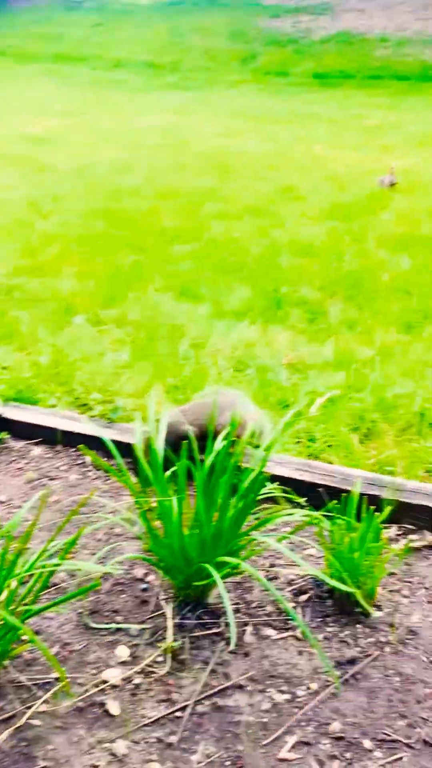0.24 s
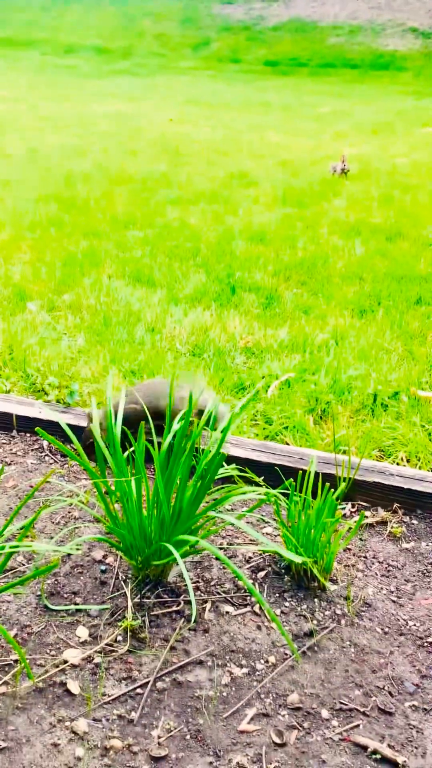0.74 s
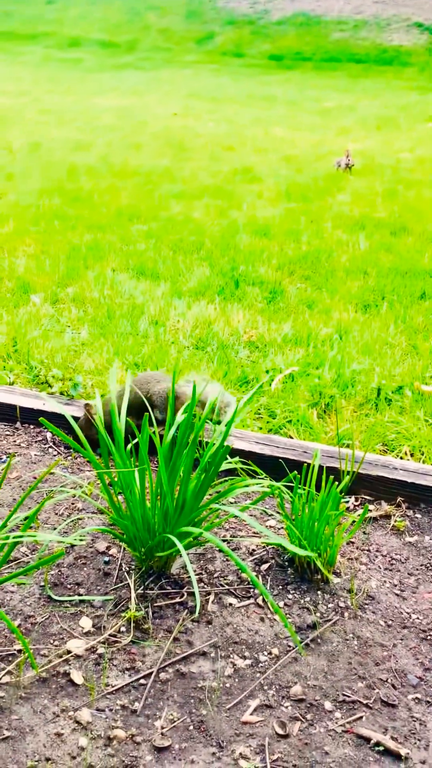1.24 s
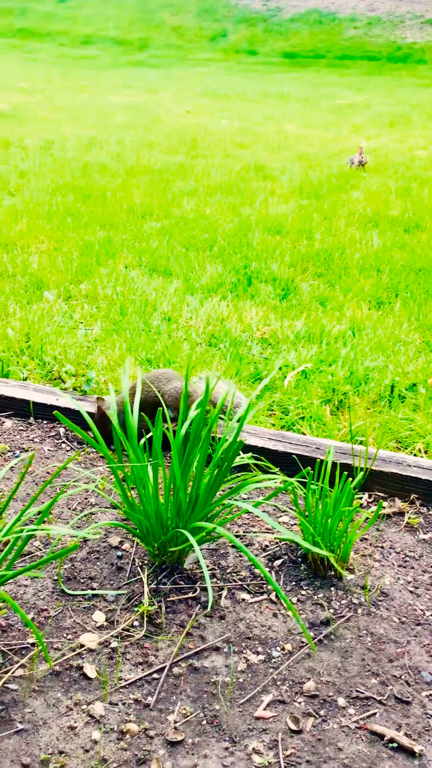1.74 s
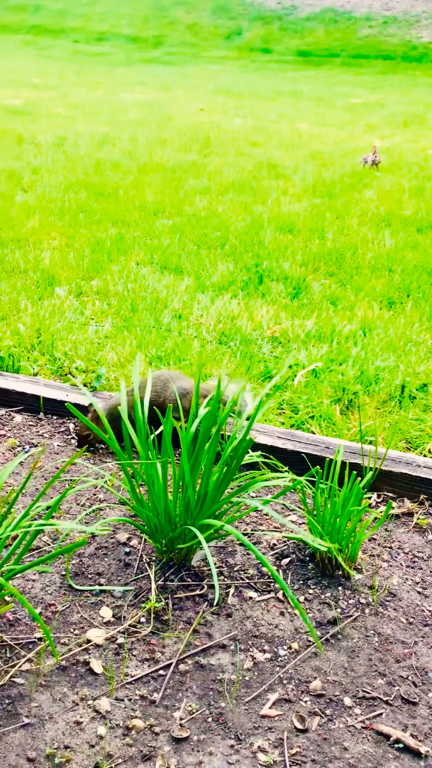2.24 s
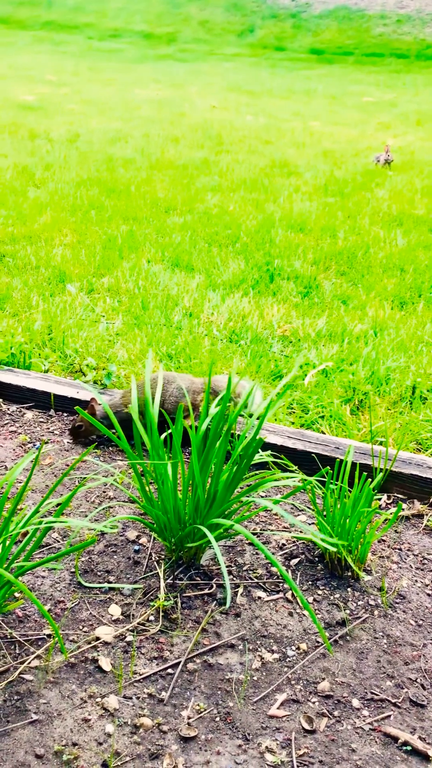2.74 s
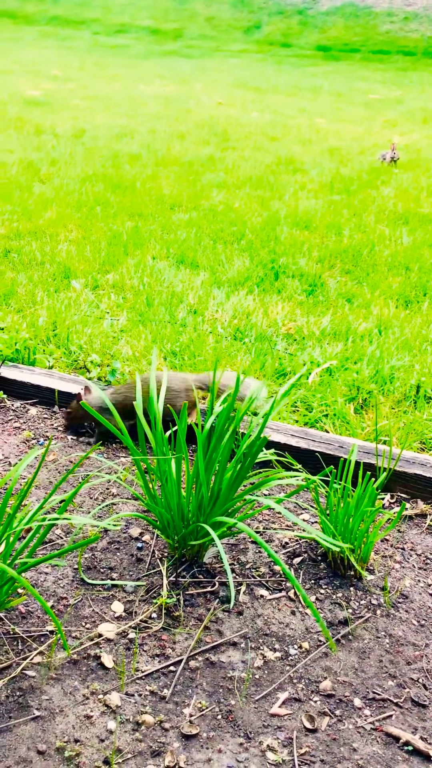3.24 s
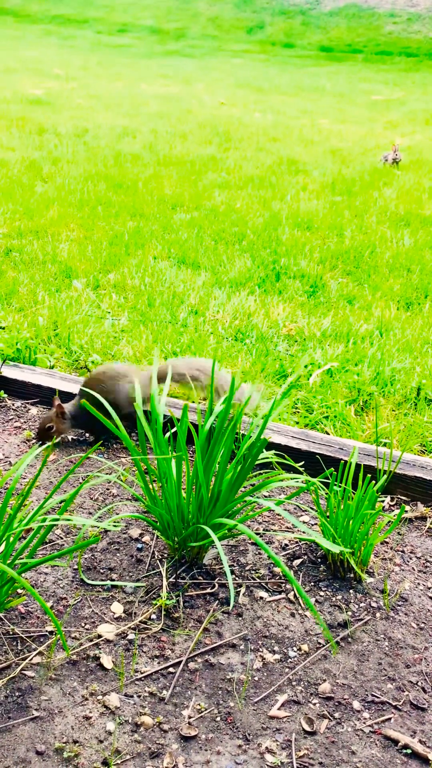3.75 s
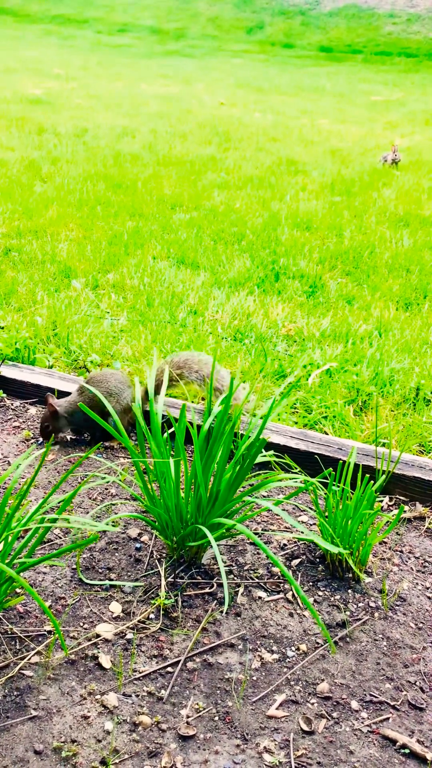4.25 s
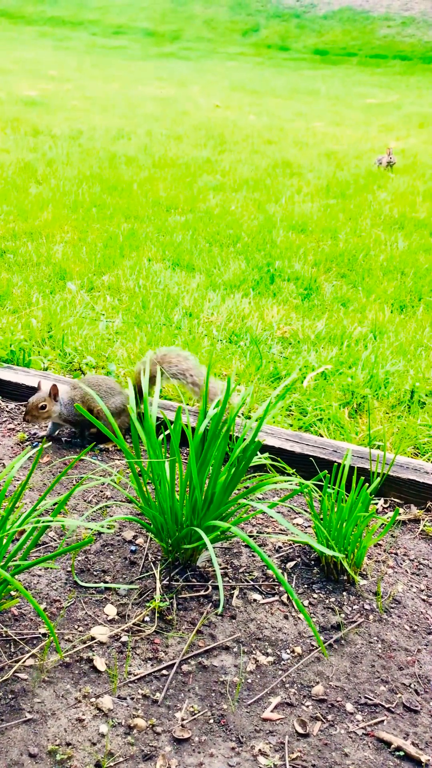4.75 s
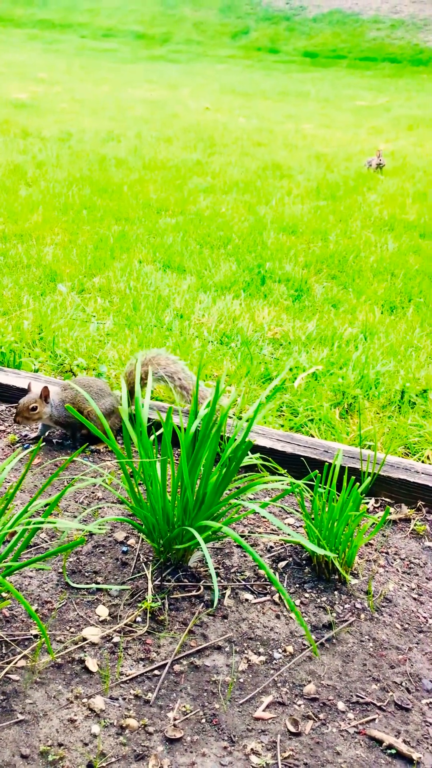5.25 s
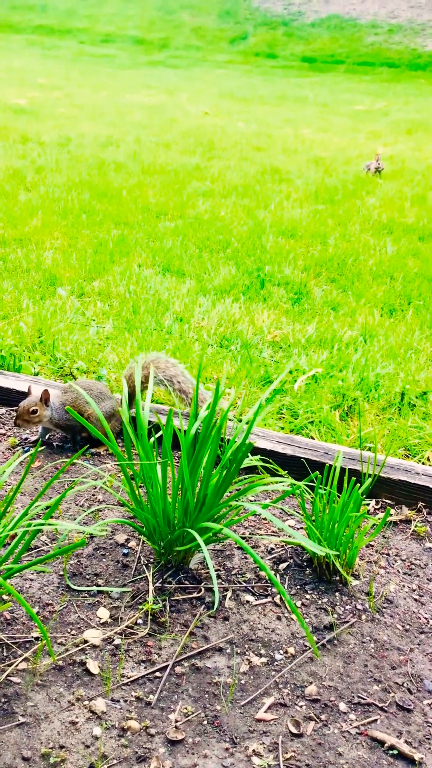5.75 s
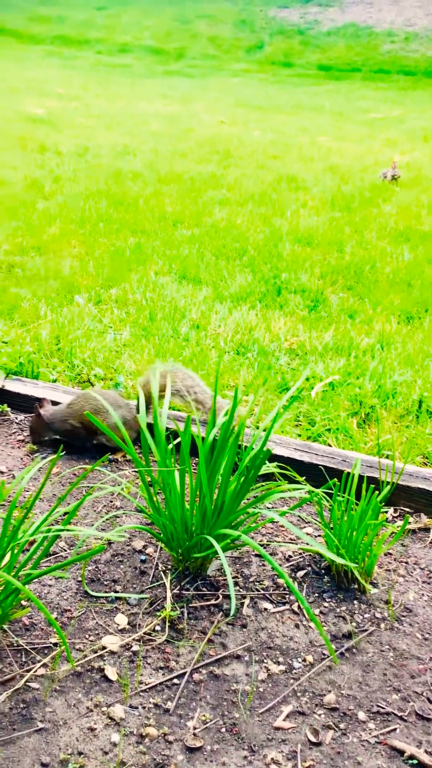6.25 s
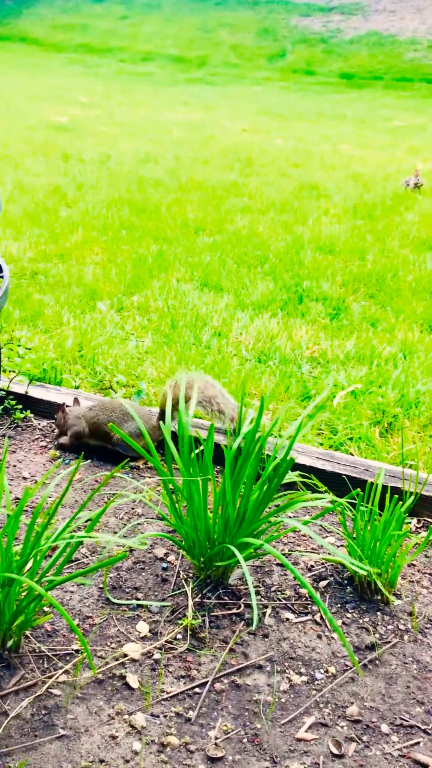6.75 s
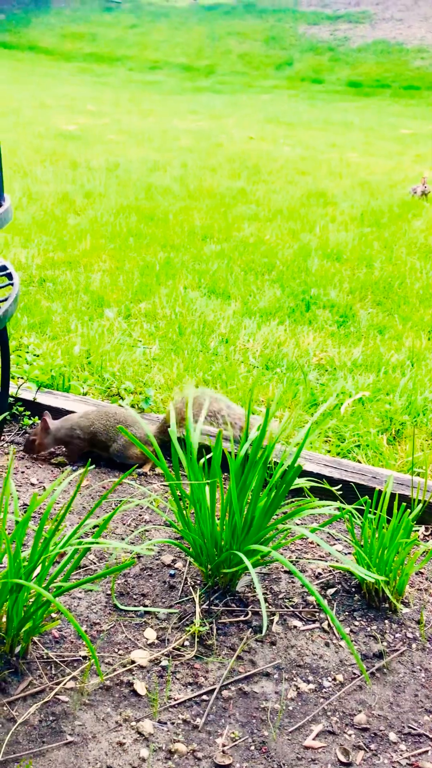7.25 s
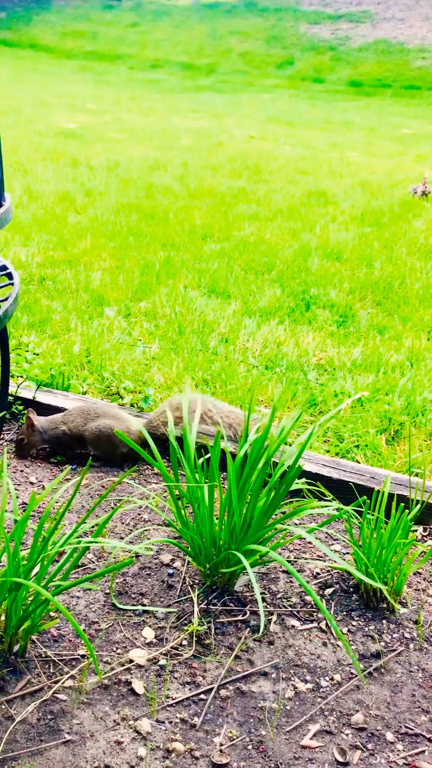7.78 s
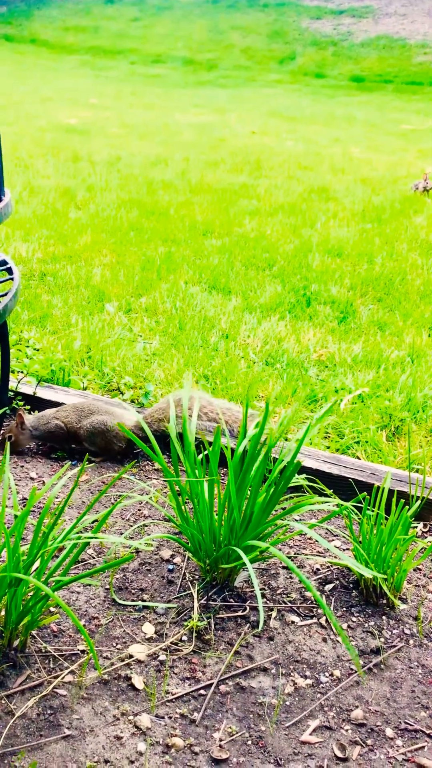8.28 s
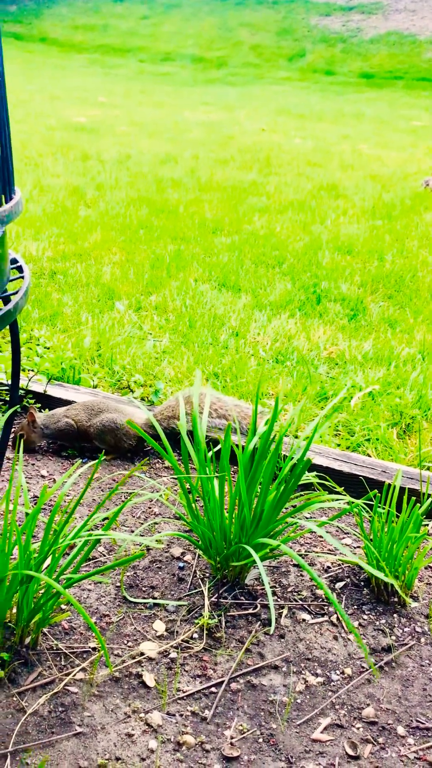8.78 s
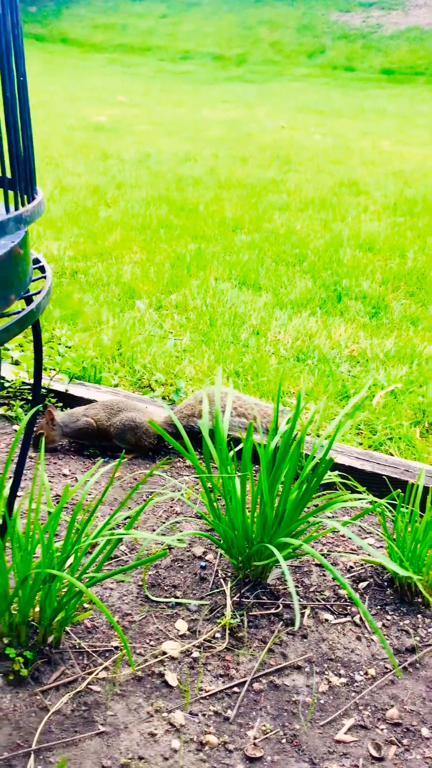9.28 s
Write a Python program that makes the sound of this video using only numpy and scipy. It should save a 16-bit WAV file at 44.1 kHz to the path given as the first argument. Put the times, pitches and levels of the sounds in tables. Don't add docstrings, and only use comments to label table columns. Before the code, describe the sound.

Outdoor phone pickup of one agitated squirrel: gritty, crackling rasps made of fast irregular clicks, dull with the mouth nearly shut and bright when open. Two barks start as slow throbs and sag in pitch. Near the end a loud scream bursts out, cut into weaker rasps. Behind lie soft road rumble, thin hiss and barely audible far whistles.

```python
import sys
import numpy as np
from scipy import signal
from scipy.fft import rfft, irfft, next_fast_len
from scipy.io import wavfile
from scipy.ndimage import uniform_filter1d, map_coordinates

SR = 44100
rng = np.random.default_rng(int(sys.argv[2]) if len(sys.argv) > 2 else 0)


def inscribe(sig):
    pcm = np.round(np.clip(np.atleast_2d(sig).T, -1, 1) * 32767)
    wavfile.write(sys.argv[1], SR, pcm.astype(np.int16))


def level_to_linear(level):
    exponent = np.asarray(level, float) / 20
    return 10 ** exponent


N = 419832
T = np.arange(N) / SR


def squirrel():
    voice = clicks() + creak() + wide_rasp() + nasal_rasp()
    voice += bark() + husky_rasp() + yap() + chest()
    voice += shut_rasp() + soft_rasp() + opening() + scream() + tired_rasp()
    return filtered(voice, lambda hz: np.exp(-1.9j) + 0 * hz)


# (time [s], peak [dB])
CLICKS = [(0.1231, -49), (4.9118, -38), (5.0736, -49), (5.082, -43.5), (5.1387, -41), (5.3023, -48),
          (5.4974, -49), (6.0122, -47), (6.044, -47), (6.0596, -39), (6.082, -39), (6.0875, -35),
          (6.0957, -28)]
# (time [s], peak [dB])
CREAKS = [(2.5854, -40), (2.5921, -33), (2.6096, -29), (2.649, -25.5), (2.679, -25.5), (6.1288, -37),
          (6.1358, -26.5), (6.2063, -19.5), (7.7695, -38), (7.7809, -33)]
# ([Hz], [dB per Hz])
SHUT = [(1137, 31, -9.5), (2060, 140, -6.5), (2195, 80, -2), (3060, 20, -0.5), (3306, 43, -0.5),
        (3690, 43, -14), (4607, 45, -11), (4840, 26, -12.5), (5280, 85, -15.5), (5500, 44, -14.5),
        (6410, 140, -15.5), (6615, 28, -18), (7926, 100, -23.5), (9030, 63, -27.5), (9550, 100, -25.5),
        (11380, 150, -34.5)], [(350, -59.5), (600, -23.5), (1090, 2), (1420, -4), (1720, -10), (1940, 3.5),
        (2690, -7), (3210, -9), (3940, -12), (4710, -10.5), (6620, -22), (7290, -23), (9450, -32),
        (10700, -40), (15600, -43)]
# ([Hz], [dB per Hz])
SOFT = [(1090, 67, -3.5), (1600, 30, -10.5), (2000, 27, -2), (2140, 61, 2), (2950, 35, -5), (3110, 39, -4),
        (3290, 76, -7), (3738, 110, -16), (4590, 42, -14), (5630, 47, -13), (6410, 66, -19),
        (7640, 170, -30), (9230, 87, -29.5), (11000, 60, -40)], SHUT[1]
# (centre [Hz], width [Hz], depth [dB])
SHUT_DIPS = [(1400, 150, -6.5), (7310, 300, -3.5), (8650, 250, -6), (10810, 410, -16), (12800, 200, -6.5),
             (14500, 400, -6), (15400, 400, -6)]


def clicks():
    closes = np.zeros((2, N))
    for row, events in zip(closes, (CLICKS, CREAKS)):
        s, db = np.transpose(events)
        row[np.round(s * SR).astype(int)] = level_to_linear(db + 13.5)
    soft = filtered(closes[0], lambda hz: 1 / (1 + (hz / 4500) ** 2))
    return throat(soft, SOFT, valley_db=-9) + throat(closes[1], SHUT, valley_db=-5, dips=SHUT_DIPS)


# ([Hz], [dB per Hz])
CREAK = [(1090, 98, -4.5), (2120, 78, 0), (3040, 53, -9.5), (4580, 36, -10.5)], [(410, -54), (700, -23.5),
         (1090, -7), (1670, -19.5), (2140, -1), (2670, -21.5), (2960, -11), (6720, -22.5), (11300, -41),
         (15600, -66.5)]
# (time [s], rate [Hz], unevenness [0-1])
CREAK_FOLDS = [(0, 617, .03)]
# (start [s], end [s], full level [dB], start under it [dB], swell [s])
CREAK_CALLS = [(0.143, 0.275, -28.5, 17, .12)]


def creak():
    level_db = breaths(CREAK_CALLS, ending_s=.008, bend=2.2)
    return rasp(level_db, CREAK, CREAK_FOLDS, valley_db=-3, flutter_db=1, scatter_db=2.5,
                breath=.65, creak_db=-28)


# ([Hz], [dB per Hz])
WIDE = [(1096, 45, -7), (1264, 120, -3.5), (2427, 73, -0.5), (2650, 180, -3.5), (3636, 98, -0.5),
        (4750, 330, -9), (5100, 35, -18), (5350, 67, -9.5), (5624, 60, -13.5), (6300, 100, -13.5),
        (6800, 270, -16.5), (7460, 72, -18.5), (9000, 160, -20.5), (9360, 79, -19.5), (9810, 120, -24),
        (11310, 100, -29.5)], [(350, -51.5), (600, -20.5), (904, -18), (1080, -3.5), (1740, -11.5),
        (2130, 0), (2580, -2), (3130, -6), (4000, -0.5), (5940, -22), (7190, -13), (8130, -23.5),
        (9320, -24.5), (12600, -42), (15600, -35)]
# (time [s], rate [Hz], unevenness [0-1])
WIDE_FOLDS = [(.26, 420, .1), (.47, 830, .16), (.56, 1090, .12)]
# (centre [Hz], width [Hz], depth [dB])
WIDE_DIPS = [(1720, 190, -5), (3180, 180, -6), (4570, 150, -6.5), (10400, 500, -4)]
# (time [s], level [dB])
WIDE_PUSH = [
    (0.24, -36),
    (0.3, -21.5),
    (0.396, -19.5),
    (0.536, -22.5),
    (0.574, -19),
    (0.672, -24),
    (0.74, -22.5),
    (0.764, -29.5),
]


def wide_rasp():
    level_db = np.interp(T, *np.transpose(WIDE_PUSH), -120, -120)
    return rasp(level_db, WIDE, WIDE_FOLDS, valley_db=-3, flutter_db=1.2, scatter_db=2.5,
                breath=.75, dips=WIDE_DIPS, crisp=.3)


# ([Hz], [dB per Hz])
NASAL = [(1095, 71, -1.5), (2010, 250, -9.5), (2172, 76, -1), (2530, 36, -10), (3030, 280, -6.5),
         (3280, 42, -6), (3640, 47, -16.5), (4475, 62, -7.5), (5295, 63, -13), (6430, 99, -16.5),
         (7660, 61, -26), (9300, 80, -27), (11100, 160, -34)], [(350, -61.5), (600, -26.5), (879, -11),
         (1080, -0.5), (1480, -11.5), (1690, -11.5), (1940, 2.5), (2450, -10.5), (3000, -13.5), (3890, -12),
         (5400, -14), (6530, -19.5), (7090, -22), (9320, -27), (15600, -50)]
# (time [s], rate [Hz], unevenness [0-1])
SHUT_FOLDS = [(0, 920, .15)]
# (centre [Hz], width [Hz], depth [dB])
NASAL_DIPS = [(7100, 300, -6), (8400, 250, -9), (9200, 150, -6.5), (10300, 610, -11.5), (12800, 300, -5),
              (14400, 600, -10), (15400, 300, -5.5)]
# (start [s], end [s], full level [dB], start under it [dB], swell [s])
NASAL_CALLS = [(0.762, 1.705, -28, 2.4, 0.18)]


def nasal_rasp():
    level_db = breaths(NASAL_CALLS, ending_s=.008, bend=2.2)
    return rasp(level_db, NASAL, SHUT_FOLDS, valley_db=-4, flutter_db=.6, scatter_db=3,
                breath=.88, dips=NASAL_DIPS, pairing_db=8, crisp=.9)


# ([Hz], [dB per Hz])
BARK = [(1330, 180, -7), (2440, 160, -5), (2940, 140, -6.5), (3460, 120, -8), (3624, 76, -3.5),
        (3950, 140, -7), (5476, 150, -11), (6120, 53, -20), (6740, 50, -22.5)], [(180, -65.5), (300, -33.5),
        (315, -40), (372, -26.5), (493, -20.5), (770, -19.5), (924, -9), (1240, -5), (1730, -9.5),
        (2450, -0.5), (2710, -10.5), (3590, -10.5), (4830, -9), (5160, -14), (15600, -43)]
# (start [s], end [s], full level [dB], start under it [dB], swell [s])
BARK_CALLS = [(1.7, 1.84, -16.5, 5.03, .018)]
# (time [s], peak [dB])
BARK_THROBS = [(1.6376, -5.5), (1.653, -0.5), (1.669, -1.5), (1.6875, -2)]
BARK_PUFF = BARK[0], [(240, -63.5), (400, -31), (654, -22), (1070, -11), (1770, -14), (2300, -4),
             (2940, -3.5), (3220, -13), (3590, 1.5), (5110, -14), (5690, -9.5), (12100, -39.5),
             (15600, -44)]


def bark():
    level_db = breaths(BARK_CALLS, ending_s=.18, bend=2.3)
    burst = rasp(level_db, BARK, slackening(), valley_db=-2, flutter_db=1.8, scatter_db=2,
                 breath=.65, breath_hz=750)
    return burst + throbs(BARK_THROBS, BARK_PUFF)


# ([Hz], [dB per Hz])
HUSKY = [(1120, 110, -1), (1504, 130, -13), (2010, 61, 0), (2710, 45, -14), (3080, 78, -4), (3300, 55, -7),
         (3640, 33, -13), (4510, 94, -12), (5260, 45, -14), (6640, 76, -20), (7890, 270, -25),
         (9400, 140, -26.5), (11300, 160, -31), (15000, 130, -43)], SHUT[1]
# (centre [Hz], width [Hz], depth [dB])
HUSKY_DIPS = [(1650, 200, -5), (10600, 700, -8), (14450, 400, -18), (15600, 800, -25)]
# (start [s], end [s], full level [dB], start under it [dB], swell [s])
HUSKY_CALLS = [(2.525, 3.055, -29.5, 22, .19)]


def husky_rasp():
    level_db = breaths(HUSKY_CALLS, ending_s=.055, bend=2.2)
    return rasp(level_db, HUSKY, SHUT_FOLDS, valley_db=-5, flutter_db=.6, scatter_db=3,
                breath=.85, creak_db=-36, dips=HUSKY_DIPS, pairing_db=9, crisp=.9)


# ([Hz], [dB per Hz])
YAP = [(2369, 379, -8.5), (3740, 99, -7), (3920, 49, -4), (4140, 50, -8), (4730, 79, -7), (5580, 220, -13),
       (7170, 59, -16), (7940, 150, -22)], [(180, -58), (300, -25), (477, -21), (879, -19.5), (987, -9.5),
       (1290, -6), (1440, 2), (1730, -20.5), (2410, 2), (3090, -16.5), (3960, -6.5), (6090, -23),
       (9530, -26.5), (10700, -44), (15600, -38.5)]
# (start [s], end [s], full level [dB], start under it [dB], swell [s])
YAP_CALLS = [(4.582, 4.715, -19, 2, 0.009)]
# (time [s], peak [dB])
YAP_THROBS = [(4.504, -38.5), (4.5167, -9.5), (4.5314, -3), (4.5512, -4), (4.5678, -4)]
YAP_PUFF = YAP[0], [(240, -67), (400, -22.5), (1080, -10.5), (1640, -9.5), (1830, -15.5), (2480, 2.5),
            (3080, -16.5), (3590, 0.5), (4310, -16), (5690, -11.5), (6050, -17.5), (6630, -18.5),
            (15600, -50)]


def yap():
    level_db = breaths(YAP_CALLS, ending_s=.13, bend=1.68)
    burst = rasp(level_db, YAP, slackening(), valley_db=-2, flutter_db=1.8, scatter_db=2,
                 breath=.5, breath_hz=800)
    return burst + throbs(YAP_THROBS, YAP_PUFF)


# (start [s], length [s], level [dB])
CHEST = [(1.749, 0.062, -49.5), (4.621, 0.06, -49)]
# (start [s], length [s], first [Hz], sag [Hz/s], level [dB])
RINGS = [(1.719, 0.029, 1340, 4500, -28), (1.737, 0.057, 1572, 4960, -31), (4.609, 0.09, 1477, 1700, -35.5)]


def chest():
    def hump(start, length):
        return np.sin(np.pi * np.clip((T - start) / length, 0, 1))

    s, rate, _ = np.transpose(slackening())
    tone = np.sin(2 * np.pi * np.cumsum(np.interp(T, s, rate)) / SR + .6 * wobble(120))
    low = tone * sum(level_to_linear(db + 3.5) * hump(start, length) ** 2 for start, length, db in CHEST)
    sway = .4 * wobble(150)
    flutter = level_to_linear(2.5 * wobble(100))
    rings = np.zeros(N)
    for start, length, hz, sag, db in RINGS:
        u = T - start
        rings += level_to_linear(db + 0.5) * hump(start, length) * np.sin(2 * np.pi * (hz - sag * u / 2) * u + sway)
    return low + flutter * rings


# (start [s], end [s], full level [dB], start under it [dB], swell [s])
SHUT_CALLS = [(6.122, 7.302, -27, 10.5, .32)]


def shut_rasp():
    level_db = breaths(SHUT_CALLS, ending_s=.055, bend=2.2)
    return rasp(level_db, SHUT, SHUT_FOLDS, valley_db=-4, flutter_db=.6, scatter_db=3,
                breath=.8, creak_db=-34, dips=SHUT_DIPS, pairing_db=8, crisp=.9)


# (centre [Hz], width [Hz], depth [dB])
SOFT_DIPS = [(8500, 500, -9), (10500, 700, -11.5), (14500, 500, -5), (15580, 900, -26)]
# (start [s], end [s], full level [dB], start under it [dB], swell [s])
SOFT_CALLS = [(7.767, 8.03, -32, 9, .25)]


def soft_rasp():
    level_db = breaths(SOFT_CALLS, ending_s=.055, bend=2.2)
    return rasp(level_db, SOFT, SHUT_FOLDS, valley_db=-5, flutter_db=.6, scatter_db=3,
                breath=.85, creak_db=-32, dips=SOFT_DIPS, pairing_db=7, crisp=.85)


# ([Hz], [dB per Hz])
OPENING = [(2240, 99, -7.5), (3310, 84, -6), (4320, 410, -5), (5000, 39, -13), (6730, 210, -12),
           (7290, 33, -19.5), (7400, 33, -18), (9120, 90, -21.5)], [(350, -61.5), (600, -21), (967, -17.5),
           (1080, -7.5), (1810, -10.5), (2190, -5), (2960, -5.5), (3390, -11), (3840, -6.5), (4340, 0.5),
           (4910, -11.5), (5330, -7.5), (6100, -15.5), (6620, -13.5), (15600, -45)]
# (time [s], rate [Hz], unevenness [0-1])
SCREAM_FOLDS = [(7.99, 1020, .11), (8.2, 1140, .11), (8.63, 1180, .13)]
# (start [s], end [s], full level [dB], start under it [dB], swell [s])
OPENING_CALLS = [(7.985, 8.163, -19, 9.5, 0.056)]


def opening():
    level_db = breaths(OPENING_CALLS, ending_s=.008, bend=2.2)
    return rasp(level_db, OPENING, SCREAM_FOLDS, valley_db=-3, flutter_db=1, scatter_db=5, breath=.25)


# ([Hz], [dB per Hz])
SCREAM = ([(1296, 200, -11), (2623, 71, 1.5), (3380, 38, -4), (3690, 62, -4), (4450, 730, -7.5),
           (5160, 47, -10.5), (5500, 92, -9), (5710, 110, -17.5), (6000, 42, -32), (6667, 110, -12.5),
           (7420, 83, -18.5), (7740, 82, -19.5), (9040, 68, -21), (10000, 96, -25), (11130, 52, -39)],
           [(350, -72), (600, -22), (981, -19.5), (1120, -10.5), (1760, -13), (2550, -0.5), (3130, -8),
           (3390, -7.5), (4520, -3), (5110, -19.5), (6810, -13.5), (8350, -24.5), (9070, -23), (11300, -36),
           (15600, -39.5)])
# (centre [Hz], width [Hz], depth [dB])
SCREAM_DIPS = [(3110, 198, -5), (3870, 150, -7), (4930, 150, -9), (6250, 250, -7), (7600, 130, -6)]
# (start [s], end [s], full level [dB], start under it [dB], swell [s])
SCREAM_CALLS = [(8.158, 8.637, -18.5, -1.5, .35)]


def scream():
    level_db = breaths(SCREAM_CALLS, ending_s=.032, bend=3.2)
    return rasp(level_db, SCREAM, SCREAM_FOLDS, valley_db=-3, flutter_db=.9, scatter_db=4.5,
                breath=.4, dips=SCREAM_DIPS, crisp=.5)


# ([Hz], [dB per Hz])
TIRED = ([(1040, 69, -17), (1684, 26, -13.5), (1960, 220, -4), (2270, 110, -4), (2680, 43, -7.5),
          (2980, 66, -2.5), (3330, 34, -12), (3623, 61, -14), (3930, 37, -15), (4285, 290, -13),
          (4950, 200, -17), (6060, 24, -32), (6430, 84, -23), (8800, 120, -29.5), (9150, 54, -30),
          (12100, 94, -38)], [(350, -53), (600, -22), (767, -16.5), (994, -4.5), (1420, -13.5),
          (1760, -19.5), (1970, 0), (2480, -12), (3000, -6.5), (3580, -19.5), (4520, -12), (6620, -20.5),
          (8130, -32), (9070, -35.5), (15600, -49)])
# (time [s], rate [Hz], unevenness [0-1])
TIRED_FOLDS = [(0, 900, .18)]
# (centre [Hz], width [Hz], depth [dB])
TIRED_DIPS = [(2500, 150, -2), (8180, 300, -7), (10200, 300, -9), (11100, 200, -6.5), (11750, 200, -10),
              (14800, 800, -8)]
# (start [s], end [s], full level [dB], start under it [dB], swell [s])
TIRED_CALLS = [(8.635, 9.305, -29.5, 8.5, .28), (9.28, 9.6, -29, 9, .25)]


def tired_rasp():
    level_db = breaths(TIRED_CALLS, ending_s=.032, bend=3.2)
    return rasp(level_db, TIRED, TIRED_FOLDS, valley_db=-4.5, flutter_db=.6, scatter_db=3.5,
                breath=.65, creak_db=-33, dips=TIRED_DIPS, pairing_db=8, crisp=.88)


# (start [s], first rate [Hz], sag [Hz/s])
BARK_SAGS = [(1.7, 780, 5100), (4.58, 620, 3500)]


def slackening():
    slack_hz, settle_s = 320, .015
    folds = []
    for s, hz, sag in BARK_SAGS:
        for u in np.arange(0, .15, .005):
            rate = slack_hz + 30 * np.logaddexp(0, (hz - sag * u - slack_hz) / 30)
            folds.append((s + u, rate, .06 + .06 * np.exp(-u / settle_s)))
    return folds


def breaths(calls, ending_s, bend):
    swell_bend, end_db = 1.3, 28.5
    level_db = np.full(N, -120.)
    for start, end, db, under_db, swell in calls:
        on = slice(round(start * SR), round(end * SR))
        to_swell = np.clip(1 - (T[on] - start) / swell, 0, 1)
        last = np.clip(1 + (T[on] - end) / ending_s, 0, 1)
        call_db = db - under_db * to_swell ** swell_bend - end_db * last ** bend
        level_db[on] = np.maximum(level_db[on], call_db)
    return level_db


def rasp(level_db, shape, folds, valley_db, flutter_db, scatter_db, breath, breath_hz=600,
         creak_db=-60, dips=(), **closing):
    dulling = 0.26
    top_db = dulling * np.clip(level_db - level_db.max(), -25, 0)
    s, rate, jitter = np.transpose(folds)
    effort = np.clip(level_to_linear(2.2 * (level_db - creak_db)), .13, 1)
    air = uniform_filter1d(level_to_linear(level_db), size=130) * level_to_linear(flutter_db * wobble(110))
    source = larynx(np.interp(T, s, rate) * effort, np.interp(T, s, jitter), scatter_db,
                    breath * (.5 + .5 * effort), breath_hz, **closing)
    voice = throat(air * source, shape, valley_db, dips)
    top = filtered(voice, lambda hz: 1 / (1 + (4000 / (hz + 1)) ** 4))
    return voice + (uniform_filter1d(level_to_linear(top_db), size=400) - 1) * top


def throbs(events, shape):
    air = np.zeros(N)
    for s, db in events:
        u = np.clip(T - s + .0015, 0, None) / .0036
        air += level_to_linear(db - 10.0) * (u * np.exp(1 - u)) ** 2
    puffs = air * larynx(1200, jitter=.3, scatter_db=2.5, breath=.4, breath_hz=400)
    return throat(puffs, shape, valley_db=-1)


def larynx(rate, jitter, scatter_db, breath, breath_hz=600, pairing_db=0, crisp=0):
    phase = np.floor(np.cumsum(rate * np.exp(jitter * wobble(900))) / SR)
    sizes = level_to_linear(scatter_db * rng.uniform(-1.7, 1.7, N) + pairing_db * (phase % 2))
    closes = np.diff(phase, prepend=0) > 0
    pulses = closes * sizes / np.sqrt(np.mean(sizes ** 2) * rate / SR)
    hiss = signal.lfilter(*signal.butter(2, breath_hz, "high", fs=SR), rng.standard_normal(N))
    top_breath = breath * (1 - crisp)
    low = np.sqrt(1 - breath) * pulses + np.sqrt(breath) * hiss
    high = np.sqrt(1 - top_breath) * pulses + np.sqrt(top_breath) * hiss
    return low + signal.lfilter(*signal.butter(2, 3000, "high", fs=SR), high - low)


def throat(x, shape, valley_db, dips=()):
    peaks, colour = shape
    hz = np.fft.rfftfreq(8192, 1 / SR)
    power = level_to_linear(2 * (along(colour, hz) + valley_db))
    for c, w, db in peaks:
        power += level_to_linear(2 * db) / (1 + (2 * (hz - c) / max(w, 100, c / 36)) ** 2) ** 2
    for c, w, db in dips:
        power *= level_to_linear(2 * db * np.exp(-(2 * (hz - c) / w) ** 2))
    cep = irfft(np.log(power / power.mean() + 1e-12) / 2)
    cep[1:4096] *= 2
    cep[4097:] = 0
    ring = irfft(np.exp(rfft(cep)))[:2048]
    return signal.oaconvolve(x, ring)[:N]


def near_walls(x):
    echoes = np.zeros(SR // 40)
    delays = rng.uniform(.002, .02, 9)
    signs = rng.choice([-1, 1], 9)
    echoes[(delays * SR).astype(int)] = signs * level_to_linear(-18 - 300 * delays)
    return signal.fftconvolve(x, echoes)[:N]


# (frequency [Hz], decay by 60 dB [s])
YARD = [(800, 0.4), (3000, 0.47), (8000, 0.26), (14000, .2)]
# (frequency [Hz], level [dB])
YARD_COLOUR = [(1200, -1), (2500, -1.5), (5000, 2), (7000, 3)]


def yard(x):
    far_db, far_longer = -14, 2.2
    hz, t, z = signal.stft(rng.standard_normal(SR), SR, nperseg=256)
    fall_db = 60 * t / along(YARD, hz)[:, None]
    fading = np.hypot(level_to_linear(-fall_db), level_to_linear(far_db - fall_db / far_longer))
    fading = level_to_linear(along(YARD_COLOUR, hz)[:, None]) * fading
    tail = signal.istft(z * fading, SR, nperseg=256)[1]
    delayed = np.pad(x, (500, 0))
    return signal.fftconvolve(delayed, tail / np.linalg.norm(tail))[:N]


# (time [s], rumble level [dB])
TRAFFIC = [
    (0, -42.5),
    (2.3, -42.5),
    (3.5, -39.5),
    (7.4, -42),
    (9.52, -44.5),
]
# (frequency [Hz], density [dB per Hz])
RUMBLE = [(21, -44), (35, -21.5), (65, 0), (124, 2.5), (198, -5), (238, -8.5), (286, -20), (320, -17.5),
          (400, -30), (520, -54), (880, -120)]
# (frequency [Hz], density [dB per Hz])
HISS = [(150, -18), (260, -6.5), (392, -8.5), (420, -12.5), (613, -8.5), (990, -13.5), (1420, -22.5),
        (1630, -25.5), (1900, -26.5), (2110, -29), (3900, -38), (4480, -42), (15600, -59.5)]


def traffic():
    rumble_db = np.interp(T, *np.transpose(TRAFFIC))
    hiss_db = -56 + .1 * (rumble_db - rumble_db.mean())
    total = 0
    for spectrum, db, band in [(RUMBLE, rumble_db, (40, 250)), (HISS, hiss_db, (300, 700))]:
        noise = filtered(rng.standard_normal(N), lambda hz: level_to_linear(along(spectrum, hz)))
        inside = filtered(noise, lambda hz: (hz > band[0]) & (hz < band[1]))
        total += noise / inside.std() * level_to_linear(db + 0.44 * wobble(2.7))
    return total


# (start [s], end [s], pitch [Hz], level [dB])
WHISTLES = [(3.199, 3.5, 3764, -74), (3.642, 3.672, 8800, -80), (3.85, 4.5, 1865, -71),
            (4.1, 4.494, 3820, -79.5)]


def whistle():
    total = np.zeros(N)
    for start, end, hz, db in WHISTLES:
        swell = np.sin(np.pi * np.clip((T - start) / (end - start), 0, 1)) ** .5
        tone = np.sin(2 * np.pi * hz * T + .5 * wobble(30))
        total += level_to_linear(db - 2 + 2.4 * wobble(24.6)) * swell * tone
    return total


def along(points, hz):
    f, v = np.transpose(points)
    return np.interp(np.log(hz + 1), np.log(f + 1), v)


def wobble(rate):
    return map_coordinates(rng.standard_normal(int(N * rate / SR) + 4), [T * rate], order=1)


def filtered(x, response):
    m = next_fast_len(N + 8192)
    return irfft(rfft(x, m) * response(np.fft.rfftfreq(m, 1 / SR)), m)[:N]


def scene():
    voice = squirrel()
    echoes = near_walls(voice) + level_to_linear(-21.5) * yard(voice)
    return (voice + echoes + traffic() + whistle())[None]


def top_cut(x):
    return signal.sosfilt(signal.butter(12, 15800, fs=SR, output="sos"), x)


def record(dry):
    ceiling = .8
    thin = filtered(dry[0], lambda hz: 1 / (1 + (33 / (hz + 1)) ** 6))
    mix = thin / (1 + np.abs(thin / ceiling) ** 6) ** (1 / 6)
    return top_cut(mix[None])


dry = scene()
out = record(dry)
inscribe(out)
```